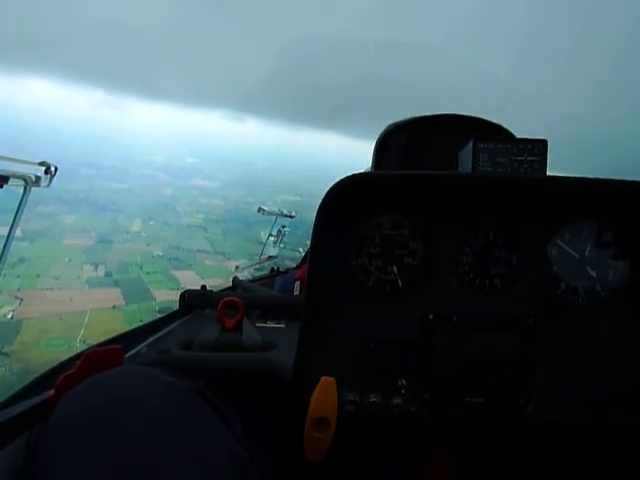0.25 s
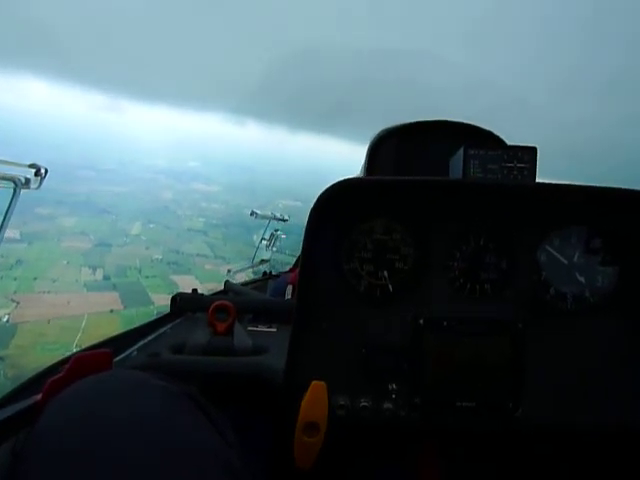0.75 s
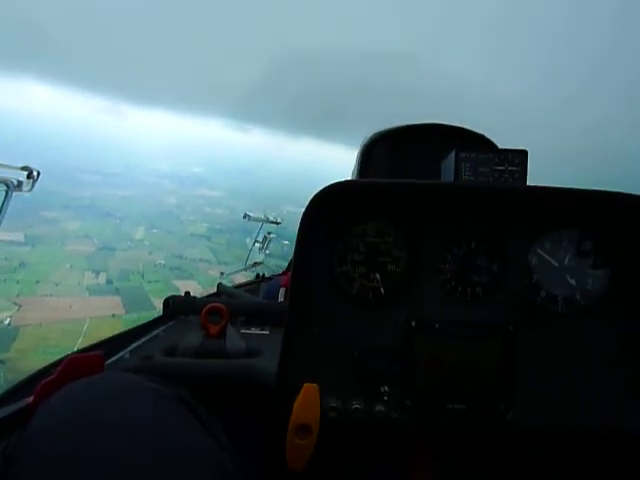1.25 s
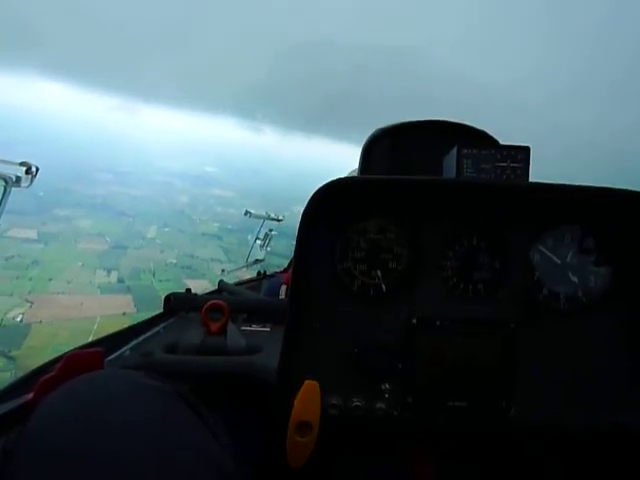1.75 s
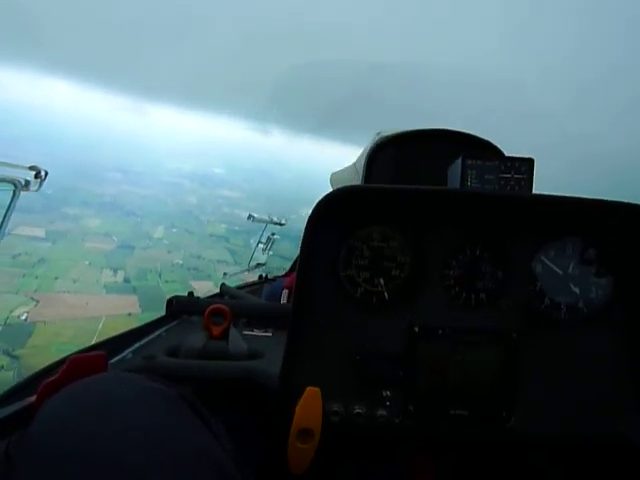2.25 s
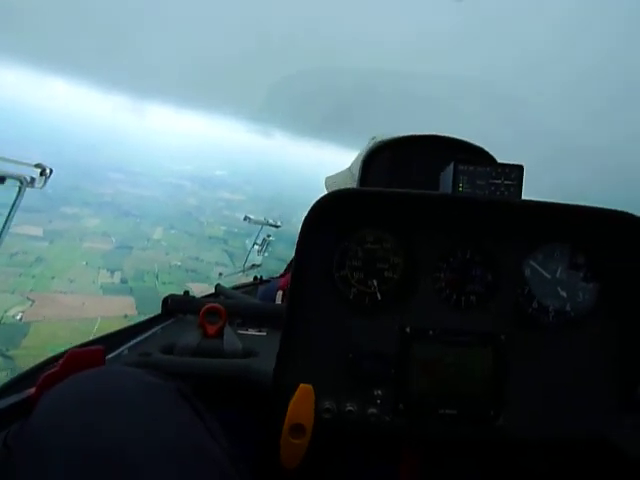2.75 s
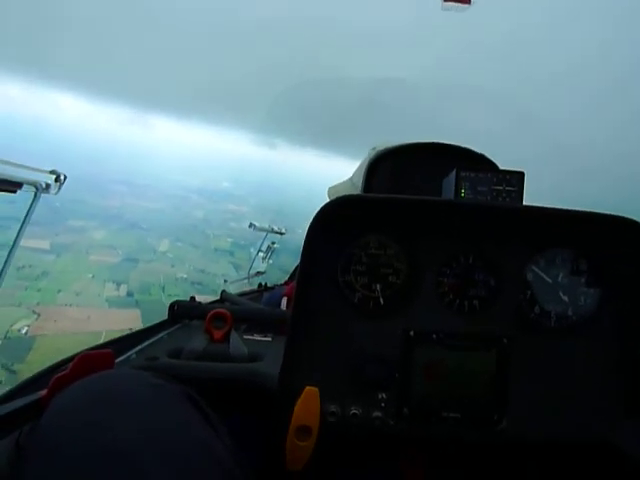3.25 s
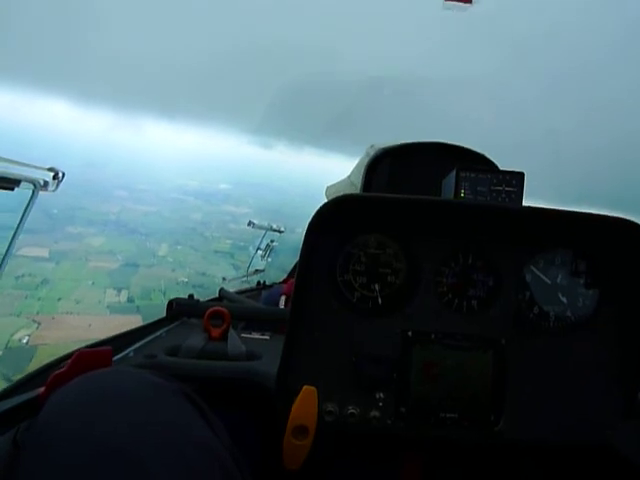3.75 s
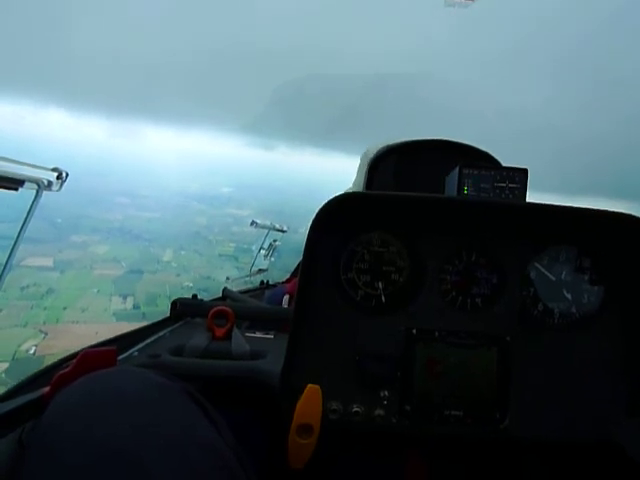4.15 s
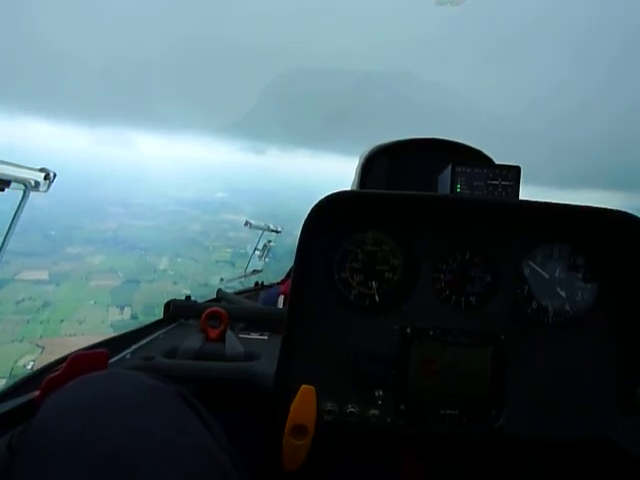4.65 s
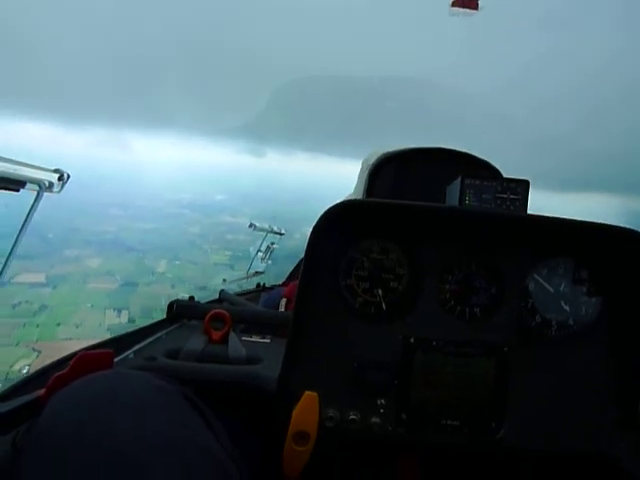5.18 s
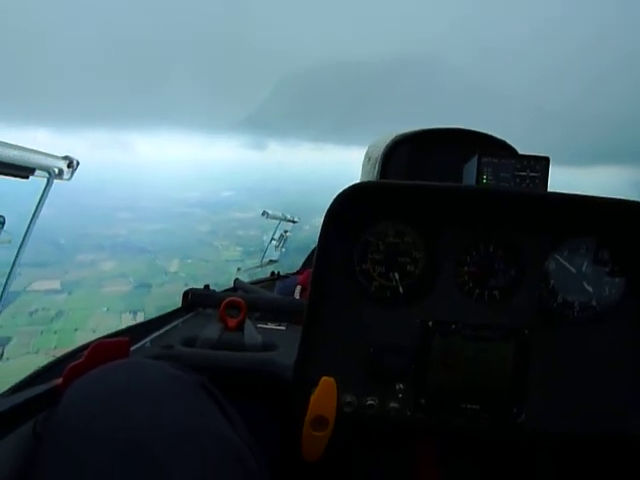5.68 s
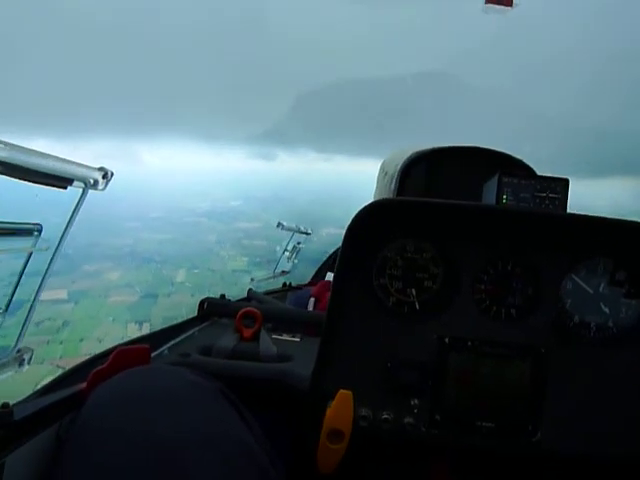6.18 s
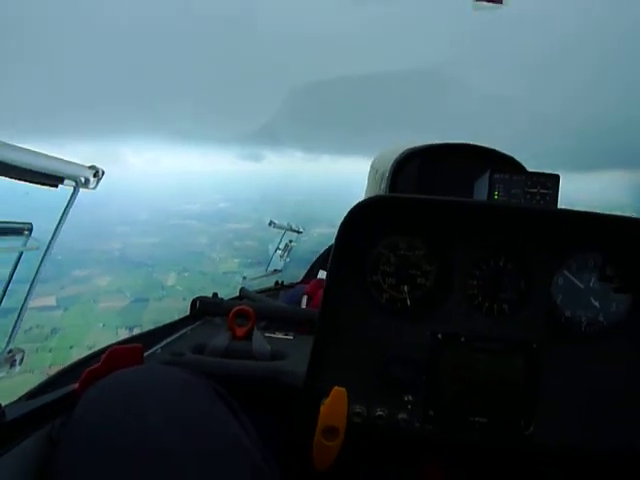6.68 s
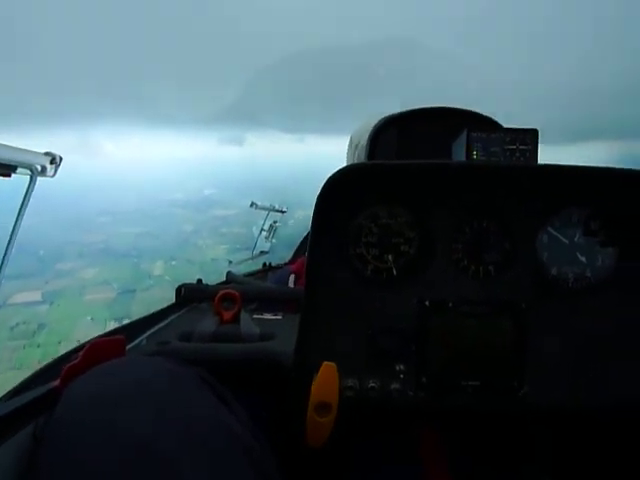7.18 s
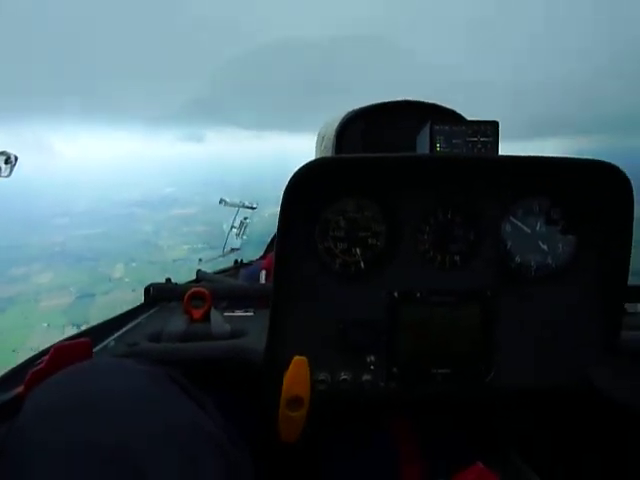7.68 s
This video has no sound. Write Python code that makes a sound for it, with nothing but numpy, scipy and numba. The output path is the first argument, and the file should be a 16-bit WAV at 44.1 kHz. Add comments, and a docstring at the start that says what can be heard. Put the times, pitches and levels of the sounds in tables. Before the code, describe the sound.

A continuous broad wind roar fills a small hollow cabin, coloured by canopy resonances. A faint light tick comes early, then a rattling cluster of knocks around two and a half seconds, followed by isolated plasticky clacks and brief fumbling on the camera body. Automatic level control pushes the wind down after hits and lets it creep back. A faint steady whistle rises towards six or seven seconds. Muffled small microphone, slight hiss.

```python
"""Inside the cockpit of a glider at speed: air rushes over the canopy and rings the hollow cabin.
The rush is shaped noise with flickering bands; a thin whine, a sine near 1.9 kHz, swells and fades.
A small camera is knocked now and then: short pushes ring the modes of its body, and fumbling adds soft bumps.
Its gain control ducks after loud peaks and creeps back up.
The camera keeps little above 4 kHz and adds its own faint hiss."""
import sys
import numpy as np
from scipy import signal
from scipy.fft import rfft, irfft
from scipy.io import wavfile
from scipy.ndimage import uniform_filter1d
from numba import njit

SR = 44100
rng = np.random.default_rng(int(sys.argv[2]) if len(sys.argv) > 2 else 0)


def wav_record(signal):
    """Record a signal, one row per channel, as 16-bit PCM in the file named by sys.argv[1]."""
    frames = np.transpose(np.atleast_2d(signal))
    bounded = np.clip(frames, -1, 1)
    # unit amplitude maps onto the largest positive 16-bit level
    quanta = np.round(bounded * 32767).astype(np.int16)
    wavfile.write(sys.argv[1], SR, quanta)


def level_to_linear(level):
    """Convert decibel levels to linear amplitude factors, elementwise."""
    exponent = np.asarray(level, float) / 20
    return 10 ** exponent


N = 349272  # length in samples


def shaped(gain):
    """Noise with this gain at each frequency."""
    return irfft(rfft(rng.standard_normal(N)) * gain, N)


def unit(x):
    """Scaled to a standard deviation of 1."""
    return x / np.std(x)


def walk(rate):
    """A slow random curve: chance levels held for 1 / rate s, smoothed twice, spread 1."""
    hold = int(SR / rate)
    steps = np.repeat(rng.standard_normal(N // hold + 1), hold)
    smooth = uniform_filter1d(uniform_filter1d(steps, hold), hold)
    return unit(smooth[:N])


# Broad colour of the turbulence. Each row: frequency in Hz, relative density in dB per Hz.
RUSH = [(20, -30), (40, -25.5), (65, -7.5), (110, -7), (200, -7), (300, -10), (450, -12), (750, -17.5),
        (1100, -15), (1800, -24.5), (2600, -18.5), (3300, -27), (5000, -25), (8000, -49.5)]
# Cabin and canopy resonances. Each row: frequency in Hz, width in Hz, peak in dB over the broad colour.
CABIN = [(97, 44, 3.5), (162, 39, 3), (230, 53.6, 8), (326, 31, 2), (365, 36, 5), (500, 31, 1.5),
         (627, 96, 4.5), (972, 114, 8.5), (1254, 49, 7.5), (1534, 65, 9), (1684, 114, 10), (1890, 67, 5),
         (2064, 49, 5), (2365, 52, 7.5), (3260, 420, 4.5)]


def air_rush():
    """Turbulence is broad noise; the cabin resonances lift it and octave bands flicker in level."""
    near_db, flicker_db = 0.5, 0.33
    hz = np.fft.rfftfreq(N, 1 / SR) + 1e-9
    colour_hz, colour_db = np.transpose(RUSH)
    db = np.interp(np.log(hz), np.log(colour_hz), colour_db, right=-60)
    for centre_hz, width_hz, peak_db in CABIN:
        db = db + peak_db / (1 + (2 * (hz - centre_hz) / width_hz) ** 2)
    out = 0
    below = walk(12)
    for octave in range(5, 13):
        # bands crossfade at equal power; the lowest and highest stay open at their outer ends
        lowest, highest = -1 * (octave > 5), 1 * (octave < 12)
        share = np.cos(np.pi / 2 * np.clip(np.log2(hz) - octave - 0.5, lowest, highest))
        # neighbours have one curve in common, so they partly move together
        above = walk(11)
        level_db = near_db * (below + above) + flicker_db * walk(25)
        out = out + level_to_linear(level_db) * shaped(level_to_linear(db) * share)
        below = above
    return unit(out)


# Swell of the whine. Each row: time in seconds, rms level in dB before the wavering.
WHINE = [(0, -52.5), (2.6, -53), (2.8, -48), (6.6, -39), (7.001, -43), (7.92, -46)]


def whine():
    """A thin sine whose pitch and level waver a little while it follows its slow swell."""
    centre_hz, waver_hz, waver_db = 1920.5, 0.8, 1.5
    phase = 2 * np.pi * np.cumsum(centre_hz + waver_hz * walk(5.4)) / SR
    level_db = np.interp(np.arange(N) / SR, *np.transpose(WHINE))
    return np.sqrt(2) * level_to_linear(level_db + waver_db * walk(5.1)) * np.sin(phase)


# Spells of fumbling. Each row: start in seconds, end in seconds, middle thud peak in dB.
FUMBLING = [(2.488, 2.78, -12.5), (3.298, 3.5, -17.5), (4.78, 4.9, -15.5)]


def bumps():
    """Fumbling as rows like the knocks: one soft bump a gap, a harder one louder and shorter in contact."""
    gap_s, scatter_db, contact_ms, crack_db = 0.05, 2, 2.2, -12
    rows = []
    for start_s, end_s, thud_db in FUMBLING:
        for s in np.arange(start_s, end_s - gap_s / 2, gap_s):
            late, hard = rng.random(2)
            bump_db = thud_db + scatter_db * (2 * hard - 1)
            rows.append((s + gap_s * late, bump_db, contact_ms * 2 ** (1 - 2 * hard), crack_db))
    return rows


# Knocks on the camera. Each row: time in seconds, thud peak in dB, contact in ms, crack peak in dB.
KNOCKS = [(0.288, -21, 1, -2), (1.923, -22, 0.86, -1.5), (2.307, -11, 0.66, 2.5), (2.405, -6, .3, 2.5),
          (2.410, -6, .3, -9), (2.414, -8, 0.45, -9), (2.434, -8, .5, -9), (2.469, -5, 2.3, -1.5),
          (2.646, -8.5, 0.38, -0.5), (2.683, -11.5, 0.62, -11), (2.731, -12.5, 0.99, -0.5),
          (2.789, -9.5, 0.84, 4.5), (3.196, -8.5, 0.74, -9), (4.258, -9.5, 0.56, 6.5),
          (4.387, -7, 1.9, -12), (4.916, -8, 0.84, 2.5), (5.560, -11.5, 0.64, -1), (5.603, -18, 2.4, 5.5),
          (5.609, -10, 0.75, -4), (5.643, -3, 1.3, 3.5), (6.301, -11, 0.89, -1), (6.861, -12, 0.86, 3.5),
          (7.436, -8.5, 1.2, 3.5), (7.440, -10, .4, -9)]
# Modes of the camera body. Each row: frequency in Hz, level in dB, time to fall by 60 dB in seconds.
BODY = [(270, -3, 0.027), (444, 3, 0.019), (704, -5, 0.03), (986, -0.5, 0.024), (1280, 3.5, 0.021),
        (1925, -3.5, 0.021), (2510, -5, 0.019), (3300, -7, 0.014)]


def knocks():
    """Each blow is a short push into the body modes; its crack is so high that only the gain control hears it."""
    rattle_db, rattle_s, spread_s = 4, 0.003, 0.0012
    crack_hz, crack_s = 12000, 0.0004
    lead_s = 0.002  # room for the rise of push and crack
    out = np.zeros(N + SR)
    t = np.arange(SR // 16) / SR
    for s, thud_db, contact_ms, crack_db in [*KNOCKS, *bumps()]:
        ring = 0
        for hz, db, t60 in BODY:
            # every blow excites a mode at a slightly different level, pitch and phase
            chance = rng.standard_normal()
            wave = np.cos(2 * np.pi * hz * (1 + 0.04 * chance) * t + 2 * chance)
            ring = ring + level_to_linear(db + 2 * chance) * wave * 1000.0 ** (-t / t60)
        # loose parts rattle dryly along
        ring = ring + level_to_linear(rattle_db) * rng.standard_normal(len(t)) * np.exp(-t / rattle_s)
        # the ring needs a moment to spread through the body
        ring = ring * (1 - np.exp(-t / spread_s))
        # a softer contact pushes longer and leaves the upper modes quiet; contact spans six sigma
        push = np.exp(-0.5 * ((t - lead_s) * 6000 / max(contact_ms, 0.1)) ** 2)
        thud = signal.fftconvolve(ring, push)[:len(t)]
        crack_shape = np.exp(-0.5 * ((t - lead_s) / crack_s) ** 2)
        crack = crack_shape * np.cos(2 * np.pi * crack_hz * (t - lead_s))
        i = int(s * SR) - int(lead_s * SR)
        out[i:i + len(t)] += level_to_linear(thud_db) * thud / np.abs(thud).max() + level_to_linear(crack_db) * crack
    return out[:N]


def scene():
    """Air rush, whine and knocks summed at the camera."""
    air_db = -22
    return (level_to_linear(air_db) * air_rush() + whine() + knocks())[None]


@njit
def ducking(over_db, hold, fall, fall_share, attack):
    """dB taken off: heads for any higher peak over the limit, holds, then creeps back, faster when deep."""
    out, want, now, wait = np.empty(len(over_db)), 0., 0., 0.
    for i in range(len(over_db)):
        if over_db[i] > want:
            want, wait = over_db[i], hold
        elif wait > 0:
            wait -= 1
        else:
            want = max(want - fall - fall_share * want, 0.)
        now += (want - now) * attack
        out[i] = now
    return out


def gain_control(dry):
    """Hears the full band, cracks included, and turns the level down a little late."""
    limit_db, lag_s, attack_s, hold_s = -3, 0.011, 0.006, 0.14
    recover_db_s, recover_share_s = 11.0, 0.7  # steady creep in dB/s, plus a share of the depth per second
    over_db = 20 * np.log10(np.abs(dry[0]) + 1e-9) - limit_db
    duck_db = ducking(over_db, hold_s * SR, recover_db_s / SR, recover_share_s / SR, 1 / (attack_s * SR))
    lag = int(lag_s * SR)
    return dry * level_to_linear(-np.r_[np.zeros(lag), duck_db[:N - lag]])


def converter_hiss():
    """Faint white noise of the converter, cut steeply above 7750 Hz."""
    hiss_db = -66.5
    hiss_cut = signal.butter(N=18, Wn=7750, fs=SR, output="sos")
    return level_to_linear(hiss_db) * unit(signal.sosfilt(hiss_cut, rng.standard_normal(N)))


def band_limit(x):
    """A steep low-pass at the top of the band."""
    return signal.sosfilt(signal.butter(12, 8820, fs=SR, output="sos"), x)


def record(dry):
    """The camera ducks the level, cuts the treble, rounds the peaks and adds hiss and a constant offset."""
    ceiling, offset = 0.36, -0.0072  # of full scale
    treble_cut = signal.butter(N=5, Wn=3600, fs=SR, output="sos")
    ducked = signal.sosfilt(treble_cut, gain_control(dry))
    rounded = ducked / (1 + (np.abs(ducked) / ceiling) ** 4) ** 0.25
    # the second cut softens the overtones that the rounding makes
    muffled = signal.sosfilt(treble_cut, rounded)
    return band_limit(muffled + converter_hiss() + offset)


dry = scene()
out = record(dry)
wav_record(out)
```